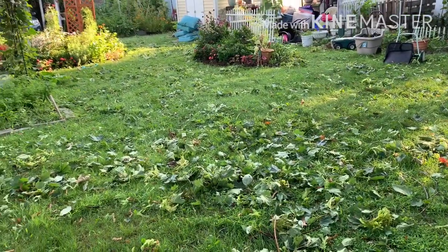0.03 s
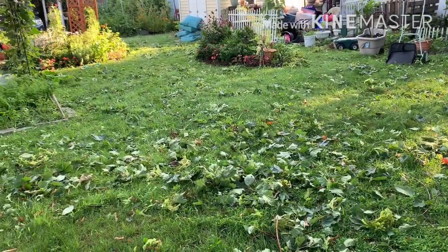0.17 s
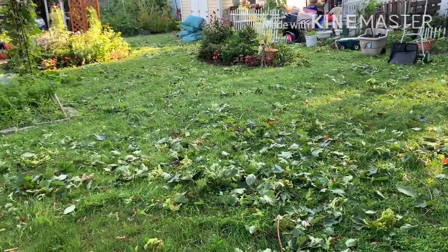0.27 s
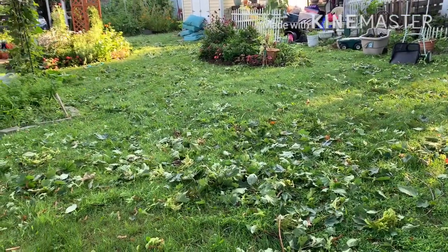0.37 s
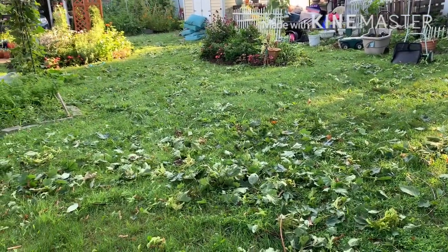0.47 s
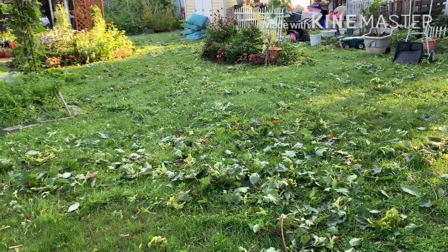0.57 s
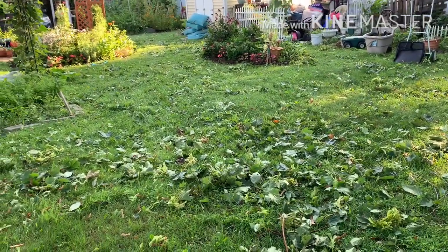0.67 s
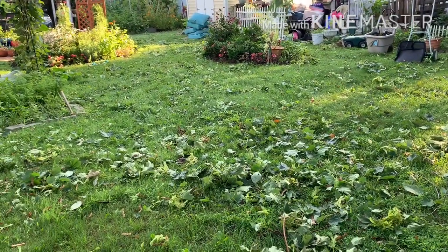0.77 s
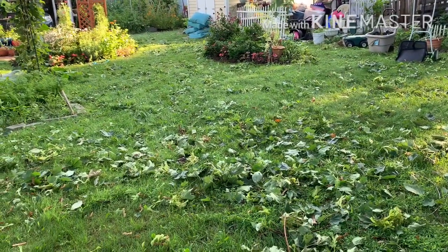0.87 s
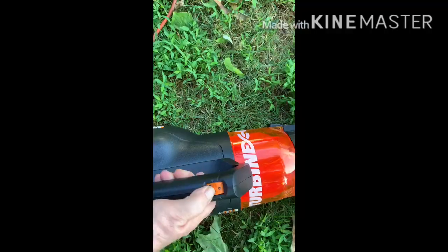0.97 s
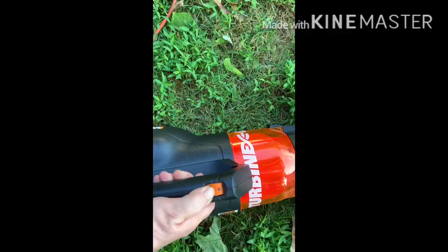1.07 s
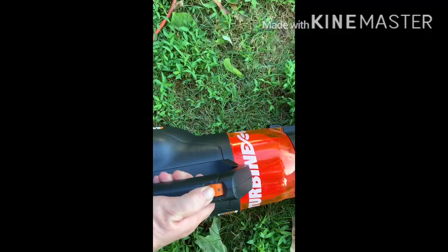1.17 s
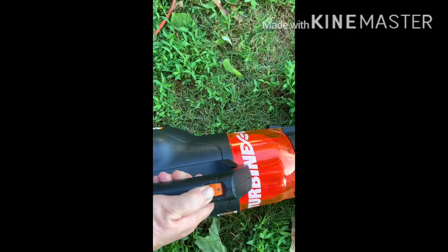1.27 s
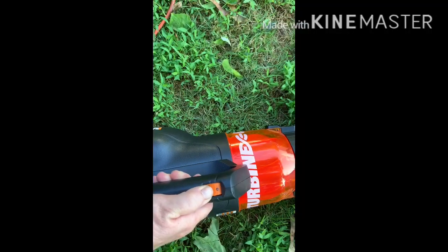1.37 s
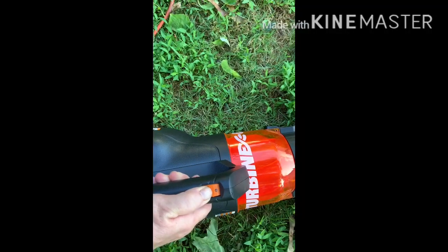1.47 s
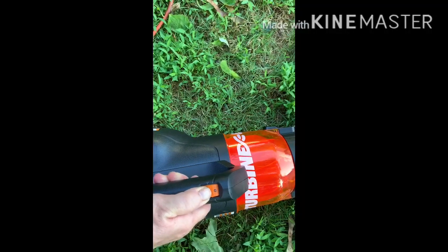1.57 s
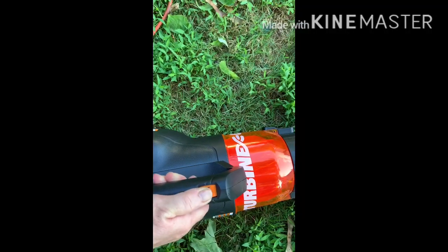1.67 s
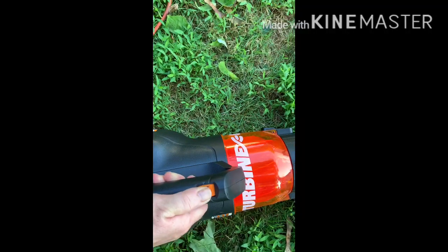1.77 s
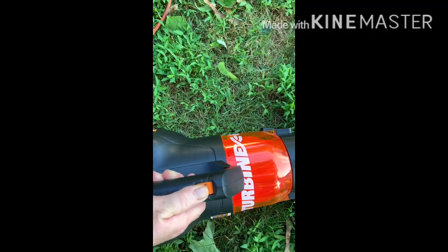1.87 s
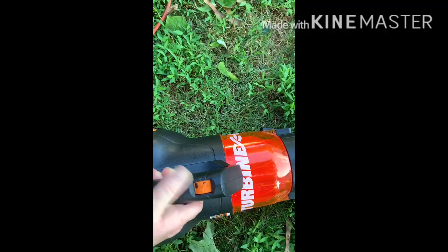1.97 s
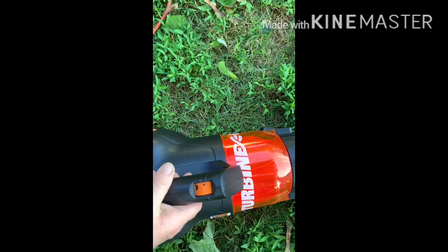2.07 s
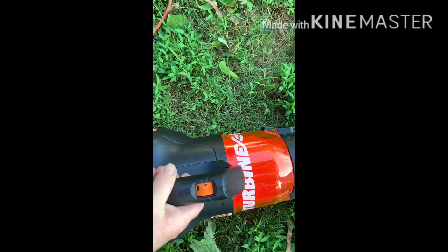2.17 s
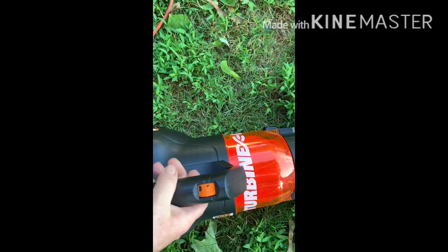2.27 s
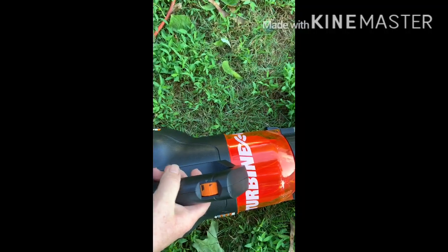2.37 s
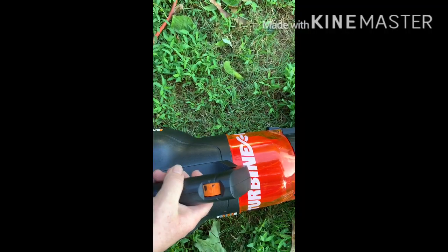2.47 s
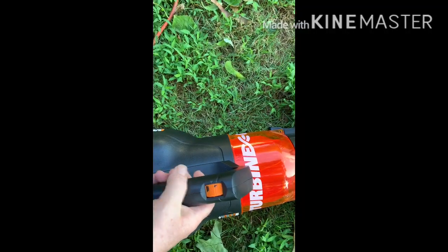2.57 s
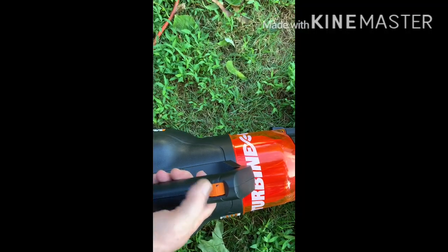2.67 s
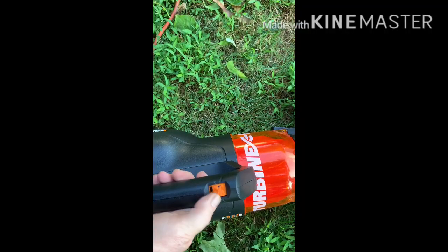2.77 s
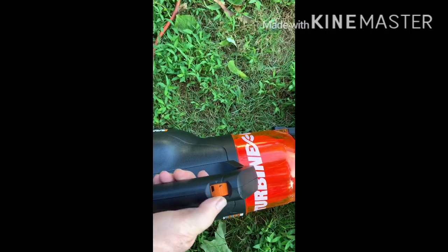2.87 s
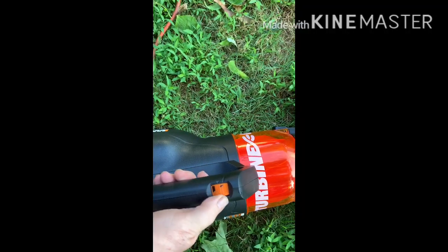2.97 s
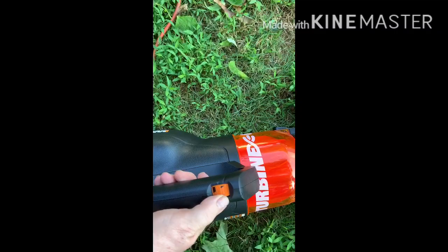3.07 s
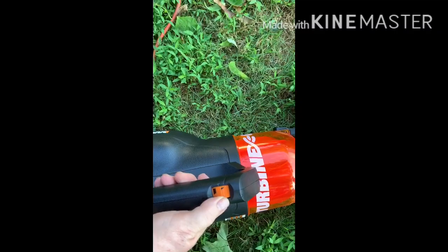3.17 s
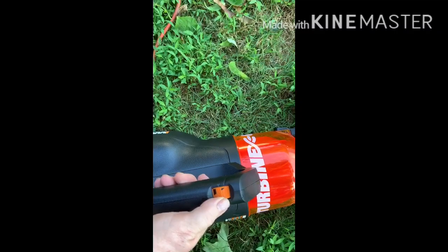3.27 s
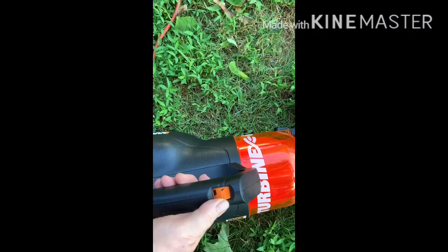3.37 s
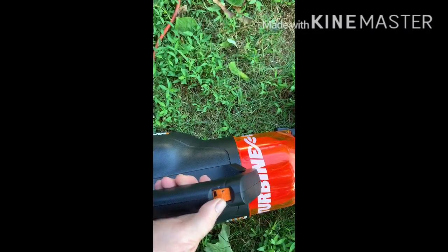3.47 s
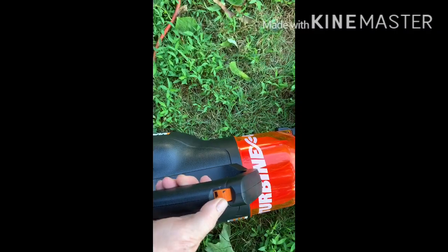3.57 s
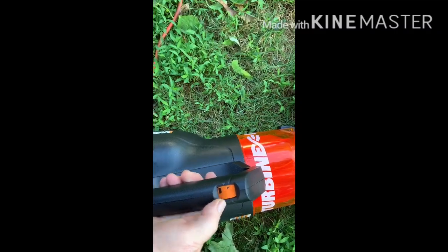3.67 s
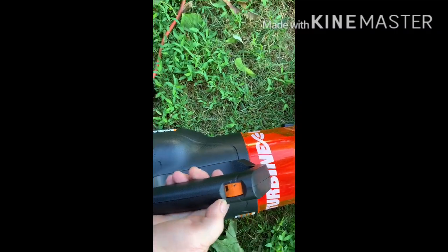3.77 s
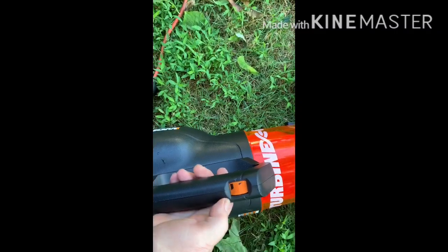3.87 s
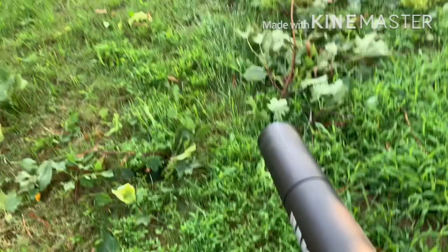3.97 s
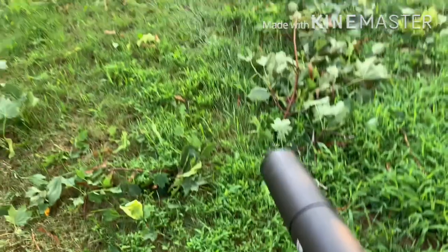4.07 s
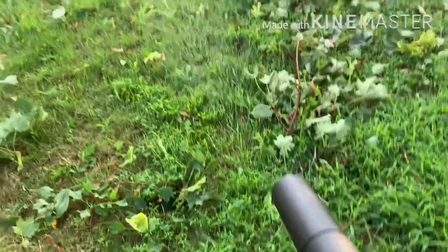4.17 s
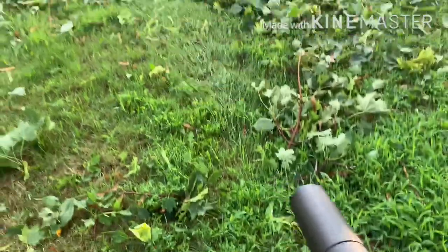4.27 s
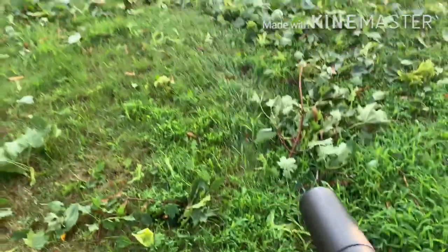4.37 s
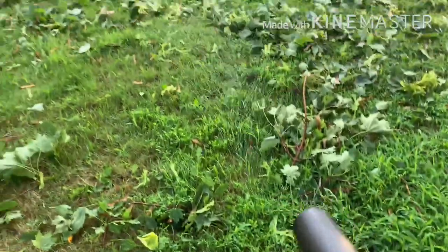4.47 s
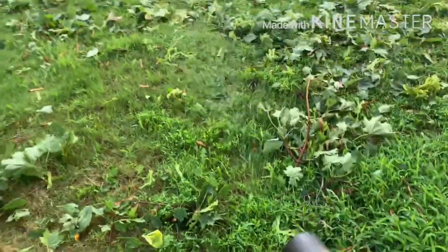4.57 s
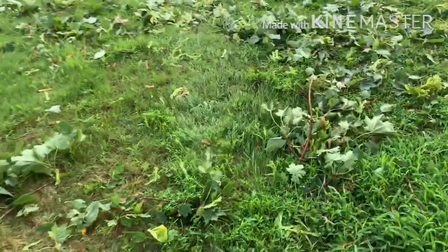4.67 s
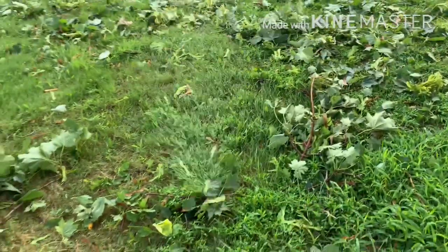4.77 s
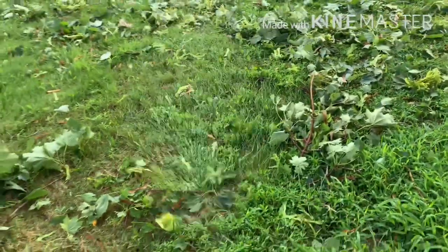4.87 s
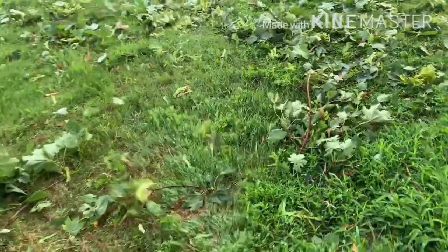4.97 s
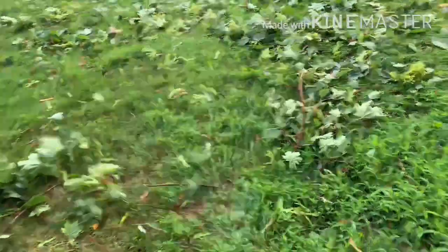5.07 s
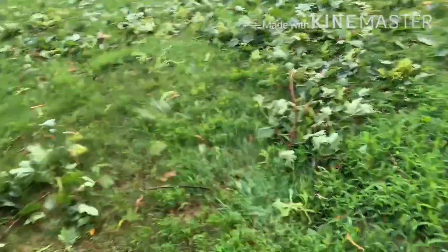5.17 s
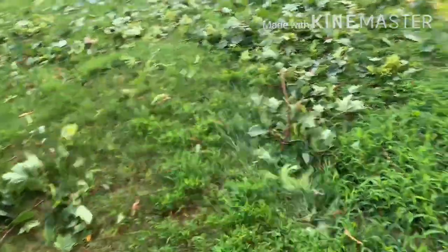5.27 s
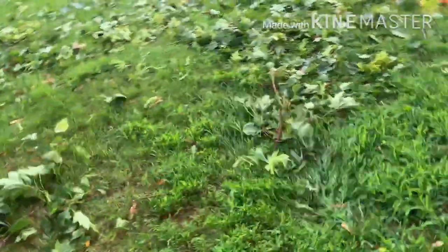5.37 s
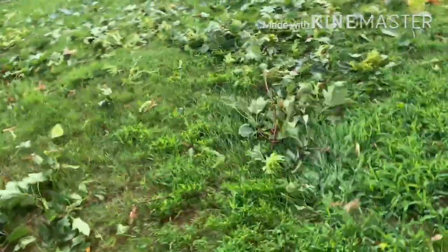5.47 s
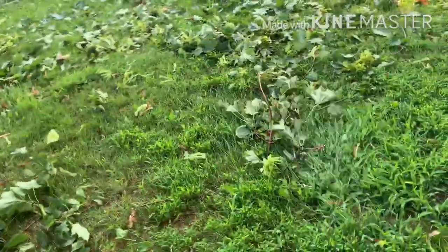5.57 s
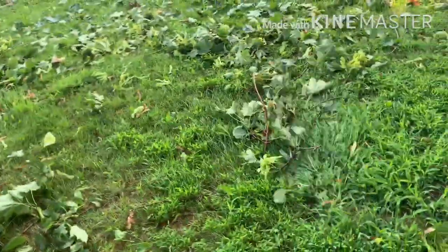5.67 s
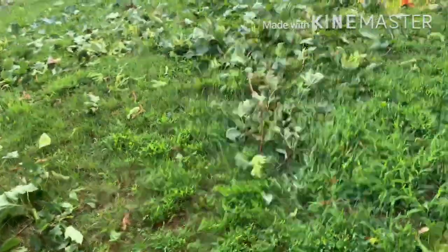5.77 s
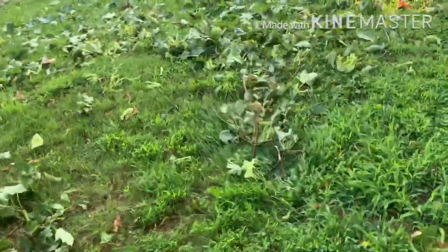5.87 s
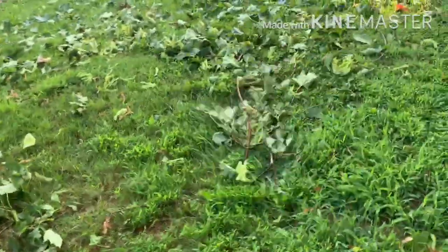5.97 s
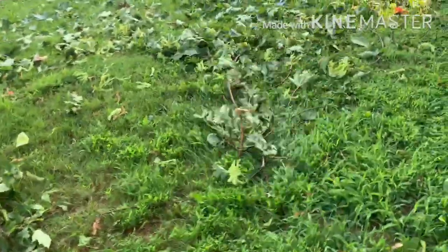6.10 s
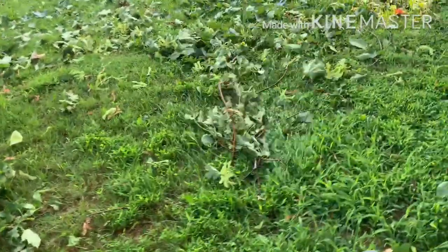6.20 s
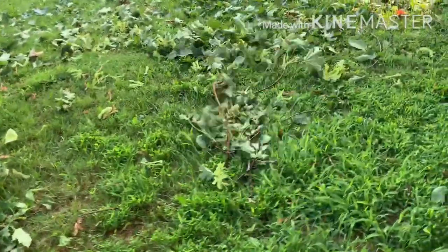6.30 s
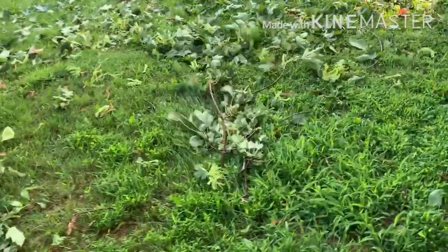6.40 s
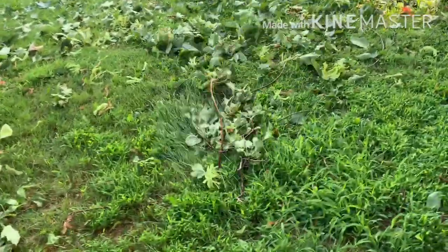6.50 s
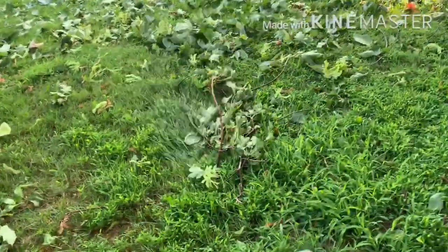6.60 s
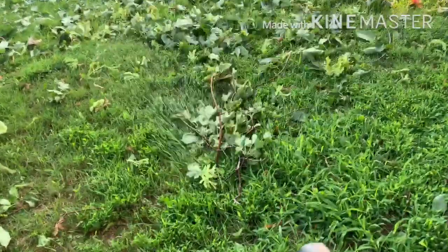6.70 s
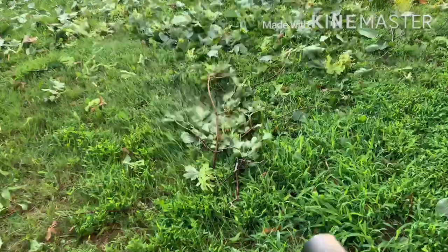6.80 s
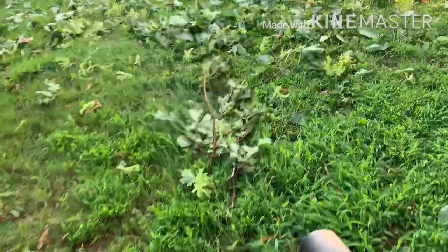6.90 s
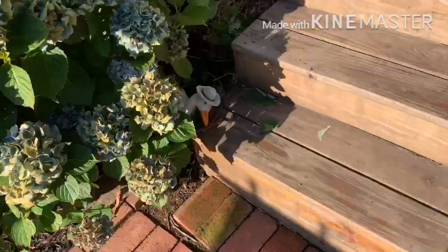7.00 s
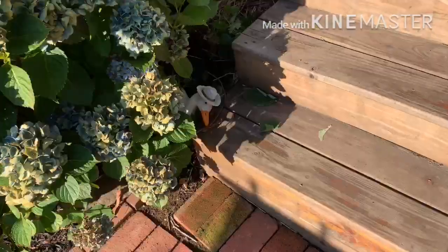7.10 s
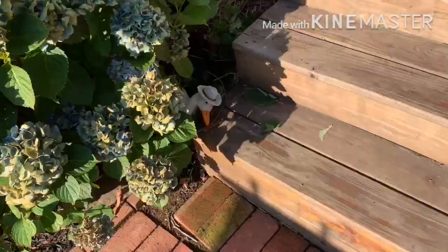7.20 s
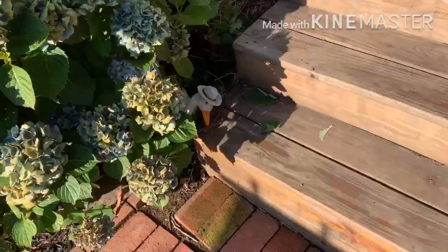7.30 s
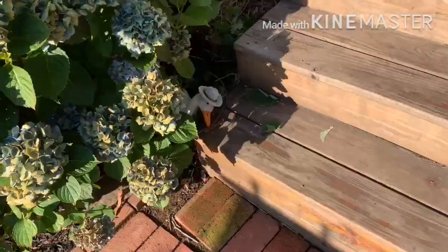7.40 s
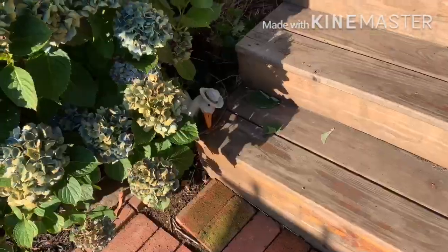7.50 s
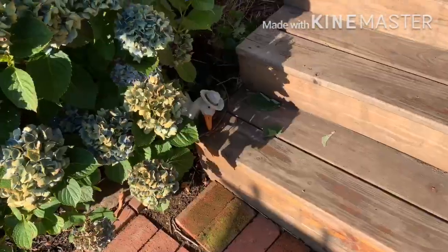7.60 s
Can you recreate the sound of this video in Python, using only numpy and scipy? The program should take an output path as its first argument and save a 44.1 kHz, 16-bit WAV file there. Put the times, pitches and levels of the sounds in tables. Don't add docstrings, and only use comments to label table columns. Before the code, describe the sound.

A quiet yard with a distant mower droning, then an electric leaf blower clicks on, spins up, runs at full speed, ending with one insect trilling.

```python
import sys
import numpy as np
from scipy import signal
from scipy.fft import rfft, irfft, next_fast_len
from scipy.io import wavfile
from scipy.ndimage import uniform_filter1d

SR = 44100
rng = np.random.default_rng(int(sys.argv[2]) if len(sys.argv) > 2 else 0)


def boost(x):
    u = np.asarray(x, float) / 20
    return 10 ** u


def log_audio(samples):
    frames = np.atleast_2d(samples).T
    limited = np.clip(frames, -1, 1)
    pcm = np.round(limited * 32767).astype(np.int16)
    wavfile.write(sys.argv[1], SR, pcm)


N = 337056
T = np.arange(N) / SR
HZ = np.fft.rfftfreq(1024, 1 / SR)
FRAME_T = np.arange(N // 256 + 5) * 256 / SR

# [start t/s, end t/s, fade in/s, fade out/s]
SHOTS = [
    (-.12, .953, .15, .15),
    (.955, 3.987, .14, .14),
    (3.996, 7.002, .16, .155),
    (7.028, 7.8, .11, .1),
]
# [from t/s, to t/s]
SILENCES = [(.938, .96), (3.987, 3.996), (7.003, 7.043)]

# [other orders level/dB, yard wash level/dB, deck drone level/dB]
MOWER_LEVELS = [
    (-39.5, -42.5, -45),
    (-38.5, -44.5, -63),
    (-52.5, -63, -48),
    (-54.5, -49, -54.5),
]
# [multiple of its turning rate, level/dB]
MOWER_ORDERS = [(3, -4.5), (5, -1.5), (6, 0.5), (7, -5.5), (8, -7.5), (9, -14.5), (12, -22), (16, -29.5),
                (17, -32)]
MOWER_HZ, OCTAVE_HZ = 29.15, 118.5
# [from t/s, level/dB, beats per s, loudest t/s, depth 0-1]
FIRING_BEAT = [(0, -38.5, 1.9, .15, 0.5), (.95, -36.5, 1.95, 1.995, .93), (3.99, -54, 2.35, 4.56, .85),
               (7.01, -43, 2.8, 7.36, 0.5)]
# [from t/s, level/dB, beats per s, loudest t/s, depth 0-1]
OCTAVE_BEAT = [(0, -33.5, 0.66, 0.64, 0.65), (.95, -37.5, 1.22, 1.91, 1), (2.62, -30.5, 0.95, 2.85, .25),
               (3.99, -50.5, 0.34, 5.68, 0.96), (7.01, -43, 2.0, 6.3, 0.74)]
# [f/Hz, width/Hz, level/dB]
DECK_MODES = [(380, 580, -2), (750, 720, -19)]
# [f/Hz, level/dB per Hz]
YARD_COLOUR = [(30, -42), (45, -40), (130, -7), (280, -20.5), (500, -29), (1000, -27.5), (2000, -31.5),
               (5300, -44), (7000, -52), (9000, -54.5), (12000, -57.5), (15500, -78)]
# [f/Hz, left-right likeness, right lead/rad, left-right level/dB]
YARD_PORTS = [(60, 0.93, -0.1, -6.5), (303, 0.52, -2, -0.5), (1220, .4, -2.5, -1.5), (3000, 0.27, -1, 0),
              (5500, .4, 2, -3), (7000, 0.99, -0.5, -5), (15000, 1, 1.5, 7)]
# [f/Hz, width/Hz, level/dB]
CHORUS_BANDS = [(5630, 110, -2), (6220, 140, -1), (6600, 300, -3.5)]
CHORUS_DB = -59

# [multiple, level/dB in the first shot, level/dB later]
WHINE_LINES = [(2.984, -56.5, -55.5), (6.08, -58.5, -73), (7.04, -60.5, -62), (11.86, -60.5, -60),
               (14.2, -59, -66.5), (15, -71, -71.5), (16.3, -76, -75), (18, -74, -78.5), (22.9, -65, -76),
               (25.7, -78, -61), (26.5, -64, -75)]
WHINE_HZ = 127.2
# [f/Hz, chirps per s, level/dB]
NEAR_INSECT = (6720, 38.3, -62)

# [t/s, peak level/dB]
SWITCH_SNAP = [
    (1.6766, -10.5),
]
# [f/Hz, level/dB, t60/s]
SWITCH_MODES = [(2550, 1, .011), (4400, -8, .009), (6600, -1, .008), (10500, -4, .007), (14500, -9, .006),
                (350, -10, .04)]

START_S, TOP_HZ, SLOW_S, QUICK_S, QUICK_SHARE = 1.703, 329.5, .27, .13, .25
BARS, MAINS_PULL_HZ = 12, 120
# [multiple, level/dB under the shaft tone]
SPIN_ORDERS = [(2, -13), (3, -19), (4, -24), (5, -20), (6, -22), (8, -22)]
# [f/Hz, width/Hz, level/dB]
SHAFT_BODY = [(156.3, 28, -24), (265, 34, -24.5), (315.6, 47, -21)]
# [f/Hz, width/Hz, level/dB]
WHINE_BODY = [(2400, 150, -24), (2830, 150, -27.5), (3500, 170, -24), (3627, 200, -27), (3848, 150, -20.5),
              (3991.4, 93, -14.5)]
# [f/Hz, width/Hz, level/dB, peak t/s, spread/s]
HOUSING_MODES = [(2397, 140, 1.5, 1.92, 0.05), (2400, 170, -14, 1.77, 0.014), (2400, 200, -23.5, 1.77, .11),
                 (1410, 100, -3, 1.84, 0.025), (392, 130, -9.5, 1.71, 0.031), (795, 400, -21.5, 1.715, .04)]
# [level/dB at top speed, power of speed it grows with]
RISING_AIR = [
    (-17.5, 1.5),
    (-21, 0.96),
    (-23.5, 2.6),
]
# [t/s, spread/s, roar level/dB, rush level/dB]
SURGES = [(1.842, 0.017, 6.5, 3.5), (2.08, 0.02, 0, 1.5), (2.28, 0.016, -1, 2), (3.76, 0.028, 1.5, -1.5)]

# [f/Hz, width/Hz, level/dB]
TUBE_MODES = [
    [(229, 76.5, 4), (309.6, 83, 1.5), (469.5, 23, 4), (698.5, 65, 3), (880, 236, -11)],
    [(236.4, 59, -1.5), (370, 140, -7), (536, 29, -6), (703, 69, -4), (830, 107, -6.5)],
]
# [f/Hz, width/Hz, level/dB]
CASE_MODES = [
    [(1435, 380, 3), (1673, 210, 0.5), (2080, 540, -5.5), (2650, 400, -1.5)],
    [(1040, 94, 4), (1453, 500, 3.5), (2010, 210, -3.5), (2740, 1460, -6)],
]
# [f/Hz, level/dB per Hz]
JET_COLOUR = [
    [(1500, -23), (3100, -6.5), (3600, -0.5), (4600, 0.5), (5400, -5), (6800, -2), (7900, -0.5),
     (9500, -0.5), (11000, -2.5), (13000, -4.5), (15500, -7.5)],
    [(1500, -12), (3000, -4.5), (4500, -0.5), (5500, 2.5), (6200, 0), (7400, -0.5), (10400, 1.5),
     (11000, 5), (11600, 2), (13000, -1.5), (15500, -4)],
]
# [f/Hz, left-right likeness, right lead/rad, left-right level/dB]
AIR_PORTS = [
    [(100, .93, 0, -.5), (900, .85, 0, -1), (1600, .92, .2, -.5), (2200, .7, 0, 0), (2800, .4, -1.6, 0),
     (3300, .15, .5, 0), (4000, .65, -.1, -2), (5100, .4, -2.8, -1.5), (6200, .5, -.2, 0), (7500, .8, 0, 0),
     (15000, .75, 0, 0)],
    [(200, .85, .5, -4), (500, .8, .6, -5), (900, .2, 0, -3), (1500, .75, .9, -2), (2400, .25, 1., 0),
     (3600, .5, 0, -1), (4800, .25, 1., -3), (5500, .36, 2.7, -4), (6200, .3, .2, -1), (7500, .7, 0, 0),
     (15000, .72, 0, 0)],
]
# [from f/Hz, step/Hz]
PORT_TURN = (6250, 4650)

# [t/s, shaft tone level/dB, left-right level/dB]
SWING = [(4.15, -21, -6), (4.51, -22, -5.5), (4.92, -21, -6.5), (5.4, -23, -9.5), (5.88, -22.5, -9),
         (6.53, -22, -6.5), (6.86, -21, -7.5)]
# [multiple, level/dB under the shaft tone]
FULL_ORDERS = [(2, -23), (3, -31), (4, -31), (5, -35), (9, -34)]
# [level/dB against the shaft tone, share of its swing]
FULL_AIR = [
    (-20, 0.87),
    (-12, 1.24),
    (-15, 1.05),
]
# [t/s, spread/s, level/dB]
FLARES = [(4.28, 0.25, 8.5), (4.77, 0.045, 4.5), (5.13, .16, 10.5), (6.1, 0.084, 9), (6.78, 0.14, 3)]
# [t/s, spread/s, level/dB]
GUSTS = [(4.4, 0.3, 5.5), (6.15, 0.31, 2.5)]
FULL_HZ = 457.75

# [from t/s, depth level/dB, settling/s]
DUCK = (2.097, -9.5, 0.96)
# [0 sum 1 difference, low f/Hz, high f/Hz, ragged/Hz, at full speed/Hz]
SILENT_BANDS = [(0, 8450, 8850, 200, 460), (0, 13050, 14200, 380, 330), (1, 10460, 11670, 60, 60),
                (1, 15400, 16100, 250, 250)]
# [low f/Hz, high f/Hz]
BAND_HZ = (48, 15760)


def evened(x):
    return x / np.sqrt(np.mean(x ** 2) + 1e-20)


def columns(rows, t):
    s, *values = np.transpose(rows)
    return [np.interp(t, s, v) for v in values]


def by_shot(rows, t):
    return np.transpose(rows)[:, np.searchsorted([s[0] for s in SHOTS[1:]], t)]


def read(points, hz):
    f, *values = np.transpose(points)
    return [np.interp(np.log(hz + 1), np.log(f + 1), v) for v in values]


def wander(rate_hz):
    knots = rng.standard_normal(int(N / SR * 40) + 2)
    return 1.2 * np.interp(T * min(rate_hz, 39), np.arange(len(knots)), knots)


def bumps(events, t):
    return sum(db * np.exp(-((t - s) / w) ** 2) for s, w, db in events)


def tone(hz, db):
    turns = (np.cumsum(hz * np.ones(N)) / SR + rng.random()) % 1
    return np.sqrt(2) * boost(np.float32(db)) * np.sin(np.float32(2 * np.pi * turns))


def resonate(x, hz, width):
    turn = np.exp(2j * np.pi * np.cumsum(hz * np.ones(len(x))) / SR)
    r = np.exp(-np.pi * width / SR)
    return 2 * (turn * signal.lfilter([1 - r], [1, -r], x * turn.conj())).real


def humps(modes, hz=HZ):
    return np.sqrt(sum(boost(2 * db) / (1 + (2 * (hz - f) / w) ** 2) ** 2 for f, w, db in modes))


def band_unit(shape, lo, hi):
    return shape / np.sqrt((shape[(HZ > lo) & (HZ < hi)] ** 2).sum())


def noise(size, same, lead, balance_db, patchy_db, sway_db):
    a, b, c, d, patches, sway = rng.standard_normal((6, len(HZ), len(FRAME_T)), dtype=np.float32)
    patches = evened(uniform_filter1d(uniform_filter1d(patches, size=9, axis=0), size=14, axis=1))
    sway = evened(uniform_filter1d(uniform_filter1d(sway, size=4, axis=0), size=90, axis=1))
    lead = lead + 2 * np.pi * np.maximum(HZ - PORT_TURN[0], 0) / PORT_TURN[1]
    same = np.clip(same, 0, 1)[:, None]
    left = a + 1j * b
    right = same * left * np.exp(1j * lead)[:, None] + np.sqrt(1 - same ** 2) * (c + 1j * d)
    balance = boost(balance_db / 2)[:, None]
    z = np.array([left * balance, right / balance])
    z = z * size * boost(patchy_db * patches + sway_db * sway)
    return signal.istft(z, nperseg=1024, noverlap=768)[1][:, :N] * 0.79


def spread(x, balance_db, lead, lag_s=0):
    size = next_fast_len(N)
    turn = lead - 2 * np.pi * lag_s * np.fft.rfftfreq(size, 1 / SR)
    right = irfft(rfft(x, size) * np.exp(1j * turn), size)[:N]
    return np.array([x * boost(balance_db / 2), right / boost(balance_db / 2)])


def beating(rows):
    s, db, per_s, loudest, depth = np.transpose(rows)[:, np.searchsorted([r[0] for r in rows[1:]], T)]
    swell = 1 + np.clip(depth, 0, .99) * np.cos(2 * np.pi * per_s * (T - loudest))
    return uniform_filter1d(db + 10 * np.log10(swell), size=2000)


def mower_exhaust():
    others_db = by_shot(MOWER_LEVELS, T)[0]
    hz = MOWER_HZ * (1 + 0.0043 * wander(3))
    exhaust = tone(2 * hz, beating(FIRING_BEAT))
    exhaust += tone(OCTAVE_HZ * hz / MOWER_HZ, beating(OCTAVE_BEAT))
    exhaust += sum(tone(k * hz, others_db + db + 1.8 * wander(13)) for k, db in MOWER_ORDERS)
    return spread(exhaust, -1.4, 0.53)


def yard_wash():
    wash_db, drone_db = by_shot(MOWER_LEVELS, FRAME_T)[1:]
    wash = band_unit(boost(read(YARD_COLOUR, HZ)[0]), 240, 5600)[:, None] * boost(wash_db)
    drone = band_unit(humps(DECK_MODES), 360, 1000)[:, None] * boost(drone_db)
    before_full = FRAME_T < SHOTS[2][0]
    insects = np.outer(band_unit(humps(CHORUS_BANDS), 5000, 7500), boost(CHORUS_DB) * before_full)
    size = np.hypot(np.hypot(wash, drone), insects)
    size *= boost(-8.5 * np.outer(HZ > 7000, FRAME_T > SHOTS[3][0]))
    return noise(size, *read(YARD_PORTS, HZ), patchy_db=1.5, sway_db=2.0)


def far_whine():
    later = T > SHOTS[1][0]
    lines = sum(tone(k * WHINE_HZ, db + (later_db - db) * later + 1.5 * wander(11))
                for k, db, later_db in WHINE_LINES)
    return spread(lines, .4, 0.14, 0.00021)


def trill():
    hz, per_s, db = NEAR_INSECT
    beat = np.cos(2 * np.pi * per_s * (T - 7.179))
    song = tone(hz * (1 + .006 * wander(39)), db + 2.9 * wander(30))
    chirps = song * np.clip(beat + 0.38, 0, 2) ** 1.2
    steady = resonate(resonate(rng.standard_normal(N), 6480, 160), 6400, 160)
    return spread(chirps + boost(db - 4) * evened(steady), -.6, 0.75)


def switch():
    s, db = SWITCH_SNAP[0]
    t = np.clip(T - s, 0, 1)
    ring = sum(boost(d - 60 * t / t60) * np.sin(2 * np.pi * f * t) for f, d, t60 in SWITCH_MODES)
    crack = boost(6.5 - 60 * t / 0.0075) * rng.standard_normal((2, N))
    return boost(db - 3.5) * (ring + crack) * np.clip(t / .001, 0, 1)


def speed(t):
    u = np.maximum(t - START_S, 0)
    shortfall = QUICK_SHARE * np.exp(-u / QUICK_S) + (1 - QUICK_SHARE) * np.exp(-u / SLOW_S)
    return TOP_HZ * np.maximum(1 - shortfall, .06)


def air(k, levels_db, flicker_db, sway_db):
    roar, rush, hiss = boost(np.array(levels_db))
    roar = band_unit(humps(TUBE_MODES[k]), 135, 300)[:, None] * roar
    rush = band_unit(humps(CASE_MODES[k]), 1000, 2760)[:, None] * rush
    hiss = 1.347 * band_unit(boost(read(JET_COLOUR[k], HZ)[0]), 6140, 7800)[:, None] * hiss
    size = np.sqrt(roar ** 2 + rush ** 2 + hiss ** 2)
    stream = noise(size, *read(AIR_PORTS[k], HZ), patchy_db=.8, sway_db=sway_db)
    return stream * boost(flicker_db * wander(30))


def rising_air():
    speed_db = 20 * np.log10(speed(FRAME_T) / TOP_HZ)
    roar, rush, hiss = (db + power * speed_db for db, power in RISING_AIR)
    roar = roar + bumps([(s, w, lift_db) for s, w, lift_db, _ in SURGES], FRAME_T)
    rush = rush + bumps([(s, w, lift_db) for s, w, _, lift_db in SURGES], FRAME_T)
    return air(0, (roar, rush, hiss), 0.34, 0.25)


def housing(pull, buzz_db):
    t = T[:SR * 5 // 2]
    uneven = 1 + .35 * np.cos(np.pi * MAINS_PULL_HZ * (t - 1.917))
    raps = uneven * np.clip(pull[:len(t)] + .2, 0, 2) ** 1.5
    grit = 1.1 * rng.standard_normal(len(t))
    buzz = np.zeros(len(t))
    for f, width, db, s, w in HOUSING_MODES:
        ring = evened(resonate(raps * (np.sin(2 * np.pi * f * t) + grit), f, width))
        buzz += boost(buzz_db + db + 26) * np.exp(-((t - s) / w) ** 2) * ring
    return np.pad(buzz, (0, N - len(t)))


def spin_up():
    hz = speed(T)
    pull = np.cos(2 * np.pi * MAINS_PULL_HZ * (T - 1.917))
    shaft = tone(hz, .8 + 1.8 * wander(18))
    shaft += tone(hz + MAINS_PULL_HZ, -7.5 + 2.2 * wander(12)) + tone(hz - MAINS_PULL_HZ, -13)
    shaft += sum(tone(k * hz, db + 4.4 * wander(11)) for k, db in SPIN_ORDERS)
    shaft *= humps(SHAFT_BODY, hz)
    shaft += tone(2 * MAINS_PULL_HZ + .8, -28.5 + 1.9 * wander(2)) * np.exp(-((T - 1.98) / 0.43) ** 2)
    jitter = .0011 + .1 * (1 - hz / TOP_HZ) ** 2
    whine = tone(BARS * hz * (1 + jitter * wander(39)), wander(30)) * (1 + .18 * pull)
    whine *= humps(WHINE_BODY, BARS * hz)
    brushes = resonate(resonate(rng.standard_normal(N), 0.87 * BARS * hz, 700), 1.06 * BARS * hz, 700)
    whine += boost(-27) * np.clip((hz - 255) / 60, 0, 1) * evened(brushes)
    buzz = housing(pull, buzz_db=-47.5)
    motor = spread(shaft, .6, -.3) + spread(buzz, -.8, .7) + spread(whine, -2.8, .15)
    return (motor + rising_air()) * np.clip((T - SWITCH_SNAP[0][0]) / 0.022, 0, 1)


def full_speed():
    shaft_db, pan_db = columns(SWING, T)
    hz = FULL_HZ * (1 + 0.000366 * wander(3))
    shaft = spread(tone(hz, shaft_db), pan_db, 0.64)
    orders = sum(tone(k * hz, shaft_db + db + 1.3 * wander(10)) for k, db in FULL_ORDERS)
    whine_db = shaft_db - 25 + bumps(FLARES, T) + 4 * wander(24)
    whine = tone(BARS * hz * (1 + .0006 * wander(30)), whine_db)
    octave = tone(2 * BARS * hz * (1 + 0.00064 * wander(30)), shaft_db - 21 + 3.2 * wander(16))
    lines = spread(orders, -.5, 0.74, 0.00051) + spread(whine, -9, 2.25) + spread(octave, .1, 0.017)
    near_db = columns(SWING, FRAME_T)[0]
    usual_db = near_db.mean()
    levels_db = [usual_db + db + share * (near_db - usual_db) for db, share in FULL_AIR]
    levels_db[0] = levels_db[0] + bumps(GUSTS, FRAME_T)
    return shaft + lines + air(1, levels_db, 0.36, 2.65)


def scene():
    back = mower_exhaust() + yard_wash()
    far = far_whine()
    shots = (far, far + switch() + spin_up(), full_speed(), trill())
    mix = np.zeros((2, N))
    for (start, end, rise, fall), shot in zip(SHOTS, shots):
        fade = np.clip((T - start) / rise, 0, 1) ** 1.52 * np.clip((end - T) / fall, 0, 1)
        mix += fade * (back + shot)
    return mix


def roll_off(x):
    return signal.sosfilt(signal.butter(12, 17100, fs=SR, output="sos"), x)


def record(dry):
    s, depth_db, settle = DUCK
    settled = 1 - np.exp(-np.maximum(T - s, 0) / settle)
    left, right = dry * boost(depth_db * settled * (T < SHOTS[2][0]))
    hz, t, z = signal.stft([left + right, left - right], SR, nperseg=2048)
    band = (hz < BAND_HZ[1]) / np.sqrt(1 + (BAND_HZ[0] / (hz + 1)) ** 8)
    keep = np.ones(z.shape) * band[:, None]
    click = abs(t - SWITCH_SNAP[0][0]) < .024
    for part, lo, hi, ragged, later in SILENT_BANDS:
        jumps = rng.choice([0, 0, 1, 1, 1, 2], (2, len(t)))
        down, up = np.where(t < SHOTS[2][0], ragged, later) * jumps
        keep[part] *= (hz[:, None] < lo - down) | (hz[:, None] > hi + up / 2) | click
    sounding = np.prod([(T < a) | (T > b) for a, b in SILENCES], axis=0)
    total, difference = signal.istft(z * keep, SR, nperseg=2048)[1][:, :N] / 2 * sounding
    return roll_off(np.array([total + difference, total - difference]))


dry = scene()
out = record(dry)
log_audio(out)
```